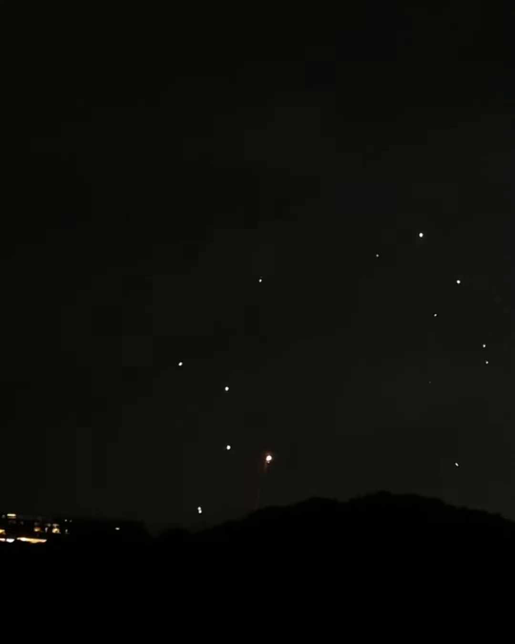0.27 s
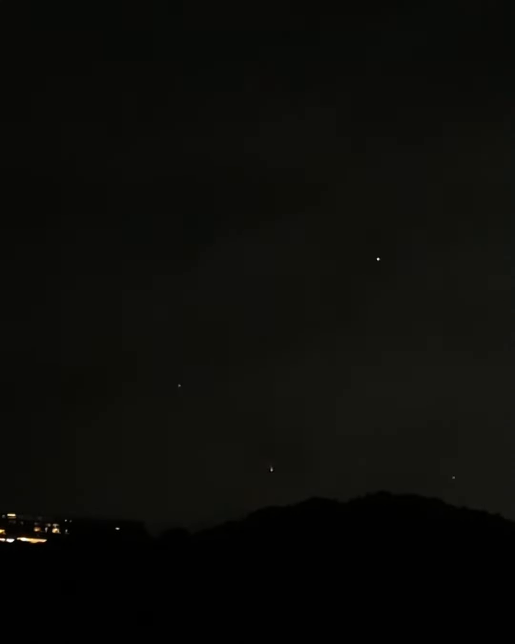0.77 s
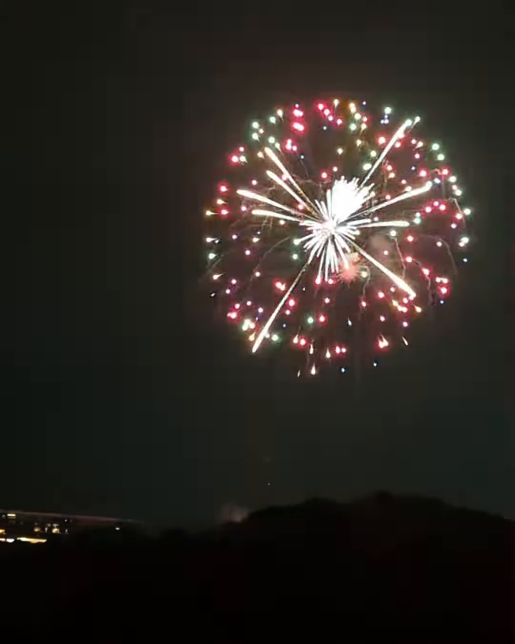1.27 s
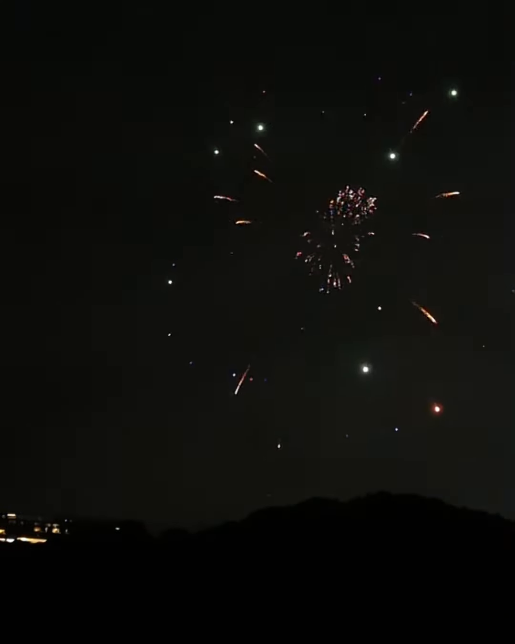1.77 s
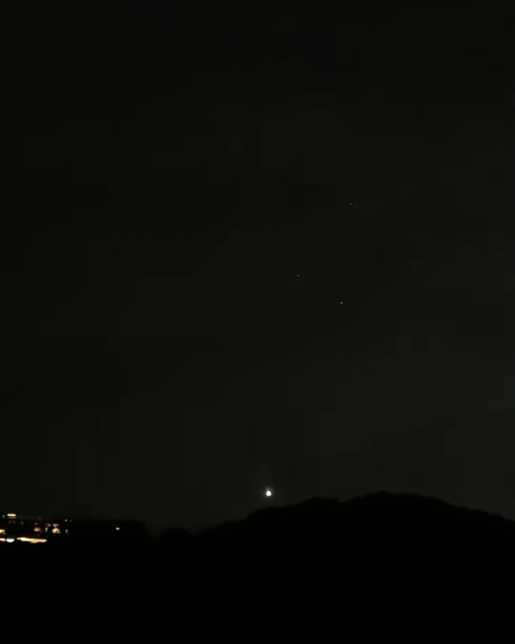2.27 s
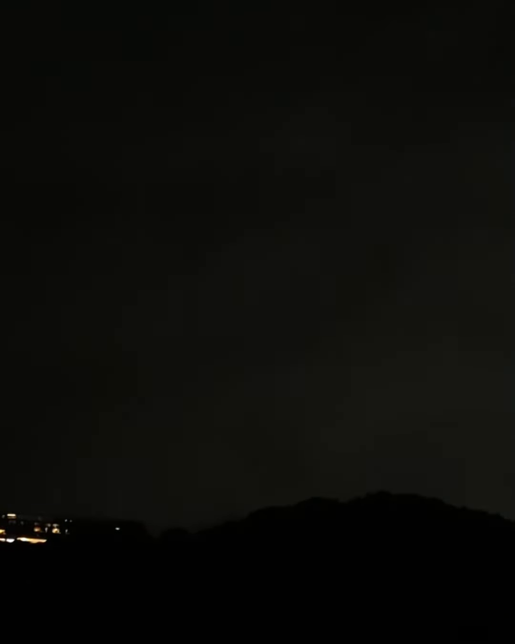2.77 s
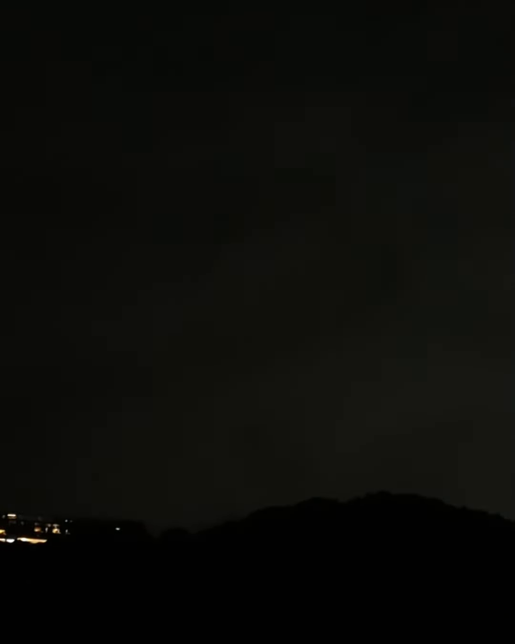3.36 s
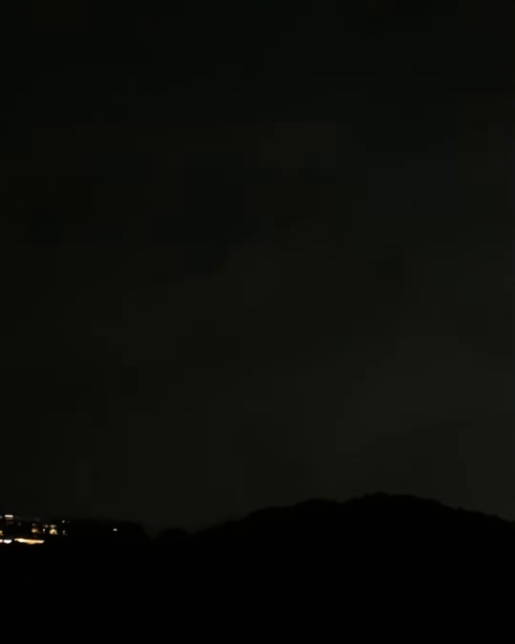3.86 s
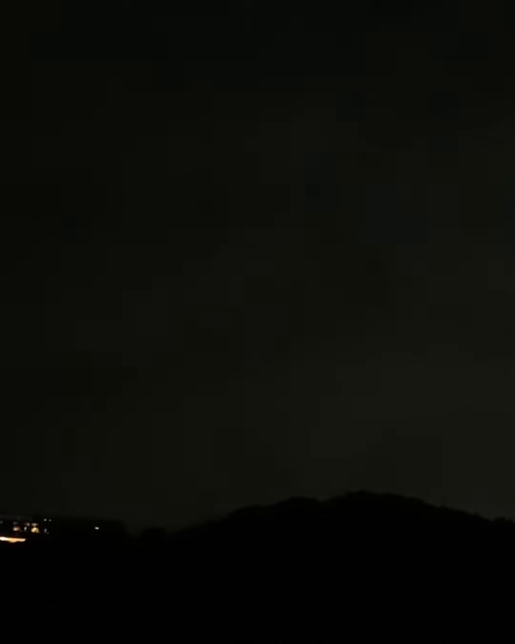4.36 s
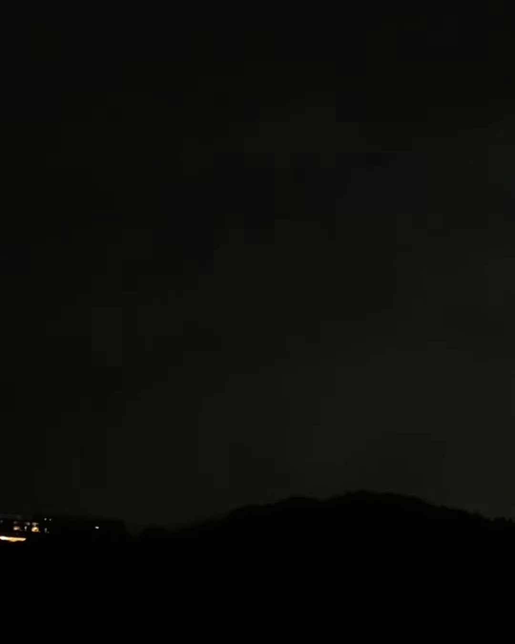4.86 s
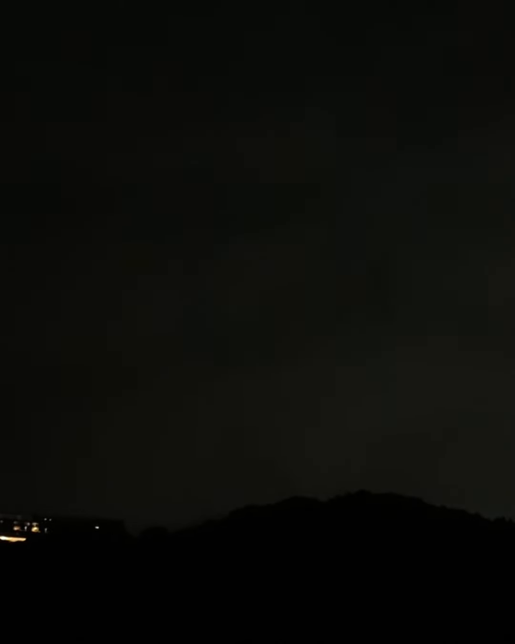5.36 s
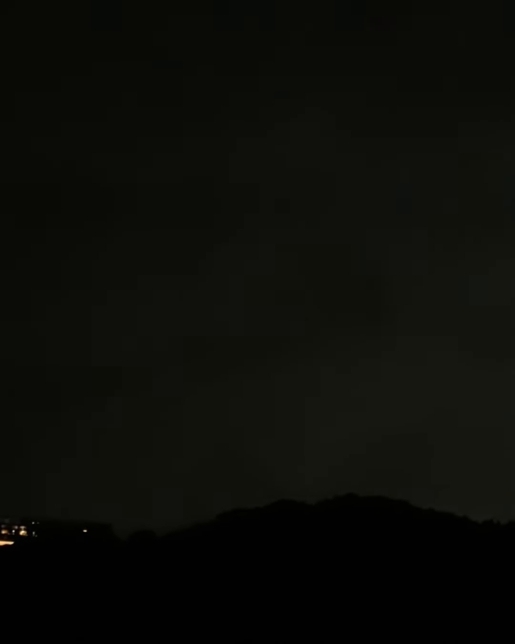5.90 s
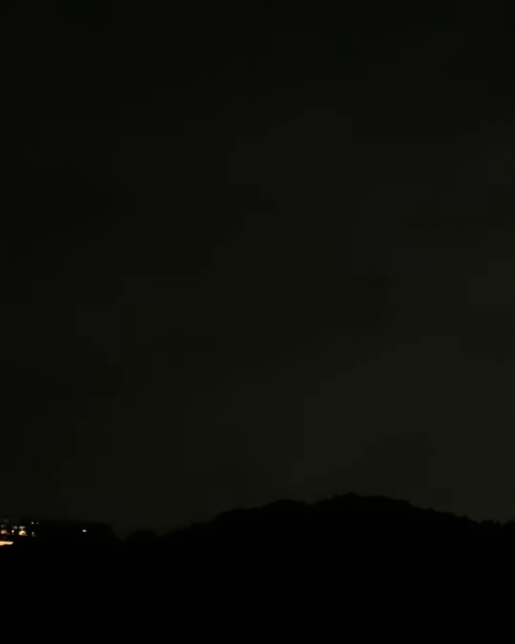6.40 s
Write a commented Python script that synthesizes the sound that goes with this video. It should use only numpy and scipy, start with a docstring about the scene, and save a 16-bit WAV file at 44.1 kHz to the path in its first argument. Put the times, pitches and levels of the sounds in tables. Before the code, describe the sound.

Night outdoors, open stereo microphone facing a far hill, with low town rumble and very faint hiss. The roll of an earlier firework fades at the start; a soft deep thud comes at 0.2 s, a clearer dull one at 0.65 and a weaker one at 0.9. At 2.1 s a shell bursts far off: hard crack, huge low boom slightly right, and a bright grainy splash from nearby surfaces lasting under 0.2 s. Echo thumps follow until about 2.8, one sharper at 2.57, another soft at 3.25, while a deep roll slowly fades. Close cloth rustles in short hissing strokes from 2.3 onward, strongest near 4.75. A faint hum slides upward from 3.3 to 4.7. Soft crackles appear at 2.8, then cluster around 5.7 and 6.4-6.5. At 5.44 the recorder is bumped dully and the low rumble dips until 6.1. Tiny high chirps occur at 6.0, 6.2 and 6.5.

```python
"""Night, open stereo microphone, facing a far hill over the low rumble of a town; an earlier shell's roll dies away.
Small far thuds come first, then at 2.1 s a firework shell bursts high over the hill: crack, deep boom, bright
splash off nearby surfaces and a long roll over the land. Close by, clothing rustles in short strokes with soft
crackles, while a faint far hum slides upward. The recorder is bumped at 5.4 s, the low rumble sinks for half a
second, and faint chirps come near the end. Blasts and bump are shaped pulses and partials; most else is noise."""
import sys
import numpy as np
from scipy import signal
from scipy.fft import rfft, irfft
from scipy.io import wavfile

SR = 44100
rng = np.random.default_rng(int(sys.argv[2]) if len(sys.argv) > 2 else 0)


def log_audio(samples):
    """Write samples as a 16-bit WAV file to the path given in sys.argv[1]."""
    # one column per channel
    frames = np.atleast_2d(samples).T
    # limit to full scale, then quantise
    limited = np.clip(frames, -1, 1)
    pcm = np.round(limited * 32767).astype(np.int16)
    wavfile.write(sys.argv[1], SR, pcm)


N = 292622
TIME = np.arange(N) / SR
BINS = np.fft.rfftfreq(N, 1 / SR)


def gain_of(db):
    """Decibels to amplitude."""
    return 10 ** (np.asarray(db) / 20)


def evened(x):
    """Scales to rms 1."""
    return x / np.sqrt(np.mean(x ** 2) + 1e-20)


def read(points):
    """A table over frequency, joined on a log axis."""
    hz, value = np.transpose(points)
    return np.interp(np.log(BINS + 1), np.log(hz + 1), value)


def filtered(x, gain):
    """Applies a gain for each frequency."""
    return irfft(rfft(x) * gain, N)


def noise(spectrum, likeness):
    """Coloured stereo noise of rms 1, partly shared between left and right."""
    same = np.clip(read(likeness), -1, 1)
    mid_side = rfft(rng.standard_normal((2, N))) * np.sqrt([1 + same, 1 - same])
    mid, side = mid_side * gain_of(read(spectrum))
    return evened(irfft([mid + side, mid - side], N))


def wander(rate_hz):
    """A random drift of rms 1, up to the given rate."""
    return evened(filtered(rng.standard_normal(N), 1 / (1 + (BINS / rate_hz) ** 4)))


def flutter(rate_hz, depth_db):
    """A gain of rms 1 that wanders at random; the depth is the rms swing."""
    return evened(gain_of(depth_db * wander(rate_hz)))


def cloud(s, spread, tail=1.1):
    """A quick smooth rise to one moment, then a slower exponential fall."""
    u = (TIME - s) / spread
    return np.exp(np.where(u < 0, -u ** 2 / 2, (1 - np.sqrt(1 + u ** 2)) / tail))


def swell(s, hold, rise, fade_db_per_s):
    """A smooth rise up to the moment s, a hold, then a steady fade."""
    rising = np.exp(-(np.minimum(TIME - s, 0) / rise) ** 2 / 2)
    return rising * gain_of(-fade_db_per_s * np.maximum(TIME - s - hold, 0))


def together(gains):
    """Unrelated sounds add in power."""
    return np.sqrt(sum(gain ** 2 for gain in gains))


def from_right(x, lag_s=.00018):
    """A sound from a little to the right reaches the left side slightly later."""
    return np.array([np.interp(TIME - lag_s, TIME, x), x])


DIP_S, DIP_END_S, DIP_DB = 5.486, 6.094, -12
DIP_FALL_S, DIP_RETURN_S = 0.058, 0.037  # time constants


def dip():
    """The gain of the low rumble, which sinks for half a second and then comes back."""
    sunk = 1 - np.exp(-np.maximum(TIME - DIP_S, 0) / DIP_FALL_S)
    return gain_of(DIP_DB * sunk * np.exp(-np.maximum(TIME - DIP_END_S, 0) / DIP_RETURN_S))


# likeness of left and right for far sounds, roll and splash included: f/Hz, correlation
FAR_LIKENESS = [(50, 1), (120, 1), (300, 0.93), (650, 0.79), (1400, 0.09), (3000, 0.07), (7000, 0.35),
                (15000, 0.62)]
# spectrum of the far town: f/Hz, relative level/dB per Hz
TOWN_SPECTRUM = [(15, -31.5), (30, -10), (55, -1.5), (100, -6.5), (210, -22), (320, -25.5), (460, -27.5),
                 (700, -29.5), (830, -39.5), (1150, -37), (2000, -47), (4000, -55), (5500, -62.5),
                 (15500, -75)]
TOWN_DB = -47.5


def town():
    """Low far rumble with a faint hiss above it, as coloured noise."""
    return noise(TOWN_SPECTRUM, FAR_LIKENESS) * gain_of(TOWN_DB) * dip() * flutter(rate_hz=4.2, depth_db=0.7)


# glide of the faint far hum: t/s, pitch f/Hz, level/dB
HUM_GLIDE = [(3.25, 92, -75), (3.42, 104.4, -42.5), (3.598, 114.2, -48.5), (3.779, 120.2, -47),
             (3.92, 130.6, -68.5), (4.1, 139.5, -52), (4.36, 151.1, -56.5), (4.7, 157.4, -62)]


def hum():
    """A faint far drone: one unsteady sine that slides upward."""
    s, hz, db = np.transpose(HUM_GLIDE)
    turns = np.cumsum(np.interp(TIME, s, hz)) / SR
    tone = np.sqrt(2) * np.sin(2 * np.pi * turns)
    heard = (TIME > s[0]) * (TIME < s[-1])
    return tone * gain_of(np.interp(TIME, s, db)) * flutter(rate_hz=8.6, depth_db=4.5) * heard


CHIRP_HZ, CHIRP_WIDTH_HZ, CHIRP_SPREAD_S = 3130, 710, 0.021
# faint high chirps, perhaps an insect: t/s, level/dB
CHIRP_TIMES = [(6.025, -72), (6.195, -69), (6.502, -71)]


def chirps():
    """Short swells of one narrow band of noise, a fuzzy whistle."""
    band = 1 / (1 + (2 * (BINS - CHIRP_HZ) / CHIRP_WIDTH_HZ) ** 4)
    whistle = evened(filtered(rng.standard_normal((2, N)), band))
    return whistle * sum(gain_of(db) * cloud(s, CHIRP_SPREAD_S) for s, db in CHIRP_TIMES)


STROKE_RISE_S, STROKE_FADE_DB_PER_S = 0.0363, 228
SETTLE_DB, SETTLE_FADE_DB_PER_S = -16.5, 31.5  # the cloth settles softly after each stroke
# likeness of left and right for cloth close to the microphone: f/Hz, correlation
CLOTH_LIKENESS = [(600, 0.56), (1500, 0.065), (3000, 0.11), (6500, 0.33), (10000, 1)]
# spectrum of the cloth: f/Hz, relative level/dB per Hz
CLOTH_SPECTRUM = [(300, -28), (900, 4), (1800, 4), (3000, 2.5), (5200, -1), (6300, 2), (7600, -1.5),
                  (8900, 1.5), (10000, -3), (12500, -6.5), (15500, -12)]
# strokes of cloth on cloth: t/s, hold/s, level/dB
CLOTH_STROKES = [(2.305, 0.41, -62.5), (2.81, 0.1, -60), (3.132, 0.083, -59), (3.304, 0.09, -74),
                 (4.25, 0.053, -68), (4.442, 0.17, -67.5), (4.759, 0.106, -56.5), (5.105, 1.15, -79.5),
                 (5.224, 0.036, -67), (5.53, 0.053, -73), (5.82, 0.012, -67.5), (6.317, 0.15, -62.5),
                 (6.6, .04, -67.5)]


def rustle():
    """Cloth slides on cloth close to the microphone: a fine hiss with a slight grain."""
    gains = []
    for s, hold, db in CLOTH_STROKES:
        gains.append(gain_of(db) * swell(s, hold, STROKE_RISE_S, STROKE_FADE_DB_PER_S))
        gains.append(gain_of(db + SETTLE_DB) * swell(s, hold, STROKE_RISE_S, SETTLE_FADE_DB_PER_S))
    return noise(CLOTH_SPECTRUM, CLOTH_LIKENESS) * together(gains) * flutter(rate_hz=100, depth_db=1.65)


RING_DB, RING_LAG_S = -3, .00036  # ring against its snaps; it comes later on the left
# likeness of left and right for the crackles: f/Hz, correlation
CRACKLE_LIKENESS = [(600, 0.52), (1500, 0.051), (6500, 0.1), (12000, 0.95)]
# spectrum of the snaps before each one's tilt: f/Hz, relative level/dB per Hz
CRACKLE_SPECTRUM = [(400, -3.5), (1000, -6), (1600, 3), (2200, 2.5), (3300, -3), (4600, -2.5), (5500, -9),
                    (6400, -1.5), (7800, -12), (8850, -9.5), (11000, -18), (15500, -27)]
# soft crackles close to the microphone: t/s, level/dB, spread/s, tilt/dB per octave, ring f/Hz
NEAR_CRACKLES = [(2.772, -45, 0.0045, 5.5, 2150), (2.788, -42, 0.0039, -2, 3320),
                 (4.158, -64, 0.0042, -6, 2400), (5.153, -55, 0.0074, 3, 8800),
                 (5.44, -49.5, 0.0085, -2, 1422), (5.567, -56, 0.0044, -6.5, 2015),
                 (5.704, -43, 0.0016, 5, 4520), (5.71, -36, 0.00089, 4, 4700),
                 (5.716, -47.5, .002, 5, 2220), (5.727, -40.5, 0.0034, 6, 2250),
                 (5.733, -40.5, 0.005, 3.5, 6400), (5.78, -45.5, 0.0057, 8, 8850),
                 (5.877, -54, 0.006, -5.5, 2420), (6.172, -64, .0045, 3, 6500),
                 (6.379, -44.5, 0.0073, 0.5, 1920), (6.523, -48, 0.0038, -9, 1950),
                 (6.543, -42, 0.0021, -20, 1900)]


def crackles(pivot_hz=4000, left_db=0.2, waver=0.0793, waver_hz=300):
    """Short clumps of tiny snaps, some dull and some bright, each with one brief, unsteady ring."""
    grain = noise(CRACKLE_SPECTRUM, CRACKLE_LIKENESS) * flutter(rate_hz=300, depth_db=2.0)
    pace = 1 + waver * wander(waver_hz)  # makes the ring's pitch unsteady
    lag = np.array([[RING_LAG_S], [0]])
    out, size = np.zeros((2, N)), 8192
    # the tilt is level from one octave below the pivot downward
    octaves = np.log2(np.maximum(np.fft.rfftfreq(size, 1 / SR), pivot_hz / 2) / pivot_hz)
    for s, db, spread, tilt_db, ring_hz in NEAR_CRACKLES:
        start = min(round(s * SR) - size // 2, N - size)
        near = slice(start, start + size)
        snaps = evened(irfft(rfft(grain[:, near]) * gain_of(tilt_db * octaves)))
        turns = ring_hz * (np.cumsum(pace[near]) / SR - lag)
        ring = np.sqrt(2) * np.sin(2 * np.pi * turns)
        out[:, near] += cloud(s, spread)[near] * gain_of(db) * (snaps + gain_of(RING_DB) * ring)
    return out * gain_of([[left_db], [-left_db]])


ROLL_RISE_S = 0.016
# the burst's long roll over the land: start, then level and fade (dB per s) of its bass and its midrange
LAND_S, LAND_BASS_DB, LAND_BASS_FADE, LAND_MID_DB, LAND_MID_FADE = 2.13, -36, 4.65, -54, 3.96
# spectra of the roll, bass and midrange: f/Hz, relative level/dB per Hz
BASS_SPECTRUM = [(15, -39.5), (30, -20.5), (50, -5), (70, -1.5), (105, -8), (150, -19.5), (220, -20.5),
                 (400, -45), (900, -86)]
WASH_SPECTRUM = [(80, -22), (180, -3.5), (450, 3.5), (720, 0), (900, -4), (1400, -6), (2000, -12),
                 (3000, -23.5), (5000, -41.5), (9000, -55), (16000, -81.5)]
# groups of echoes that follow the blasts, the first from an earlier shell:
# t/s, hold/s, bass level/dB, midrange level/dB, fade/dB per s
ECHO_GROUPS = [(0, 0.058, -52, -67.5, 10), (0.66, 0.02, -58, -55.5, 71), (0.93, 0, -53.5, -67, 63),
               (2.113, 0.052, -19, -34, 110.5), (2.23, .53, -34.5, -45, 179), (3.027, 0, -43, -50.5, 66)]


def roll(echoes_per_s=500, echo_db=-4):
    """Countless echoes merge into a deep rumble and a lumpy midrange wash."""
    low = [gain_of(LAND_BASS_DB) * swell(LAND_S, 0, ROLL_RISE_S, LAND_BASS_FADE)]
    middle = [gain_of(LAND_MID_DB) * swell(LAND_S, 0, ROLL_RISE_S, LAND_MID_FADE)]
    for s, hold, bass_db, mid_db, fade in ECHO_GROUPS:
        shape = swell(s, hold, ROLL_RISE_S, fade)
        low.append(gain_of(bass_db) * shape)
        middle.append(gain_of(mid_db) * shape)
    bass = noise(BASS_SPECTRUM, FAR_LIKENESS) * together(low) * dip() * flutter(rate_hz=9.8, depth_db=0.95)
    wash = noise(WASH_SPECTRUM, FAR_LIKENESS) * flutter(rate_hz=45, depth_db=1.5)
    arrivals = (rng.random(N) < echoes_per_s / SR) * rng.uniform(-0.61, 1, N)
    grain = evened(filtered(arrivals, gain_of(read(WASH_SPECTRUM))))  # the stronger single echoes
    midrange = evened(wash + gain_of(echo_db) * grain)
    return bass + midrange * together(middle) * flutter(rate_hz=16, depth_db=1)


# spectrum of the nearby echoes just after the burst: f/Hz, relative level/dB per Hz
SPLASH_SPECTRUM = [(200, -18), (600, 0), (1500, -6), (3000, -3), (4500, 0), (7000, -11), (10000, -17.5),
                   (13000, -39), (15500, -52.5)]


def splash(s=2.096, db=-35, t60=0.18):
    """Nearby surfaces throw the crack back as a short, bright, grainy tail."""
    fall = (TIME > s) * gain_of(db - 60 * np.maximum(TIME - s, 0) / t60)
    return noise(SPLASH_SPECTRUM, FAR_LIKENESS) * fall * flutter(rate_hz=1100, depth_db=3.0)


UPPER_RATIO, UPPER_DB = 1.7, -15.5  # each thud carries a weaker, higher partial
# the low push of the burst, its echoes, smaller thuds and a bump of the recorder at 5.44 s:
# t/s at the crest, crest level/dB, pitch f/Hz, swell/s
LOW_THUDS = [(0.167, -30.5, 92, 0.017), (0.6417, -21, 102, 0.011), (0.915, -33.5, 90, 0.028),
             (2.1032, -11, 98, 0.019), (2.12, -3, 63.3, 0.025), (2.1794, -18.5, 106.7, 0.031),
             (2.291, -19, 61, 0.022), (2.435, -22.5, 103.6, 0.019), (2.594, -21.5, 82, 0.029),
             (2.696, -26, 71.3, 0.0316), (3.243, -26.5, 83.7, 0.021), (4.321, -38, 378.6, 0.0059),
             (5.435, -27, 119.6, 0.036), (5.4459, -26.5, 74.4, 0.018)]


def thuds():
    """Far blasts, and a bump of the recorder near 5.44 s, are a few cycles that swell and die."""
    out = np.zeros(N)
    for s, db, hz, swell_s in LOW_THUDS:
        near = abs(TIME - s) < 1 / 4
        t = TIME[near] - s
        u = np.maximum(1 + t / swell_s, 0)
        upper = gain_of(UPPER_DB) * np.sin(2 * np.pi * UPPER_RATIO * hz * t)
        wave = np.cos(2 * np.pi * hz * t) + upper
        out[near] += gain_of(db) * (u * np.exp(1 - u)) ** 4 * wave
    return out


# resonances of the nearby walls, applied to all the sharp parts: f/Hz, width/Hz, level/dB over the direct sound
WALL_RESONANCES = [(425, 25, 2.5), (498, 41, 5), (695, 32, 12.5), (1160, 27, -2), (1660, 200, -5),
                   (1960, 88, 1), (2710, 70, 4.5), (3020, 110, 5), (3660, 130, -7), (6260, 790, -2)]
# the sharp part of each report, and of the bump at 5.44 s, before it is dulled:
# t/s, shock level/dB, scattered level/dB, scatter spread/s, dull above f/Hz
SHARP_PARTS = [(0.636, -28.5, -37.5, 0.00086, 900), (0.65, -52, -42.5, 0.0027, 1260),
               (0.916, -66, -54.5, 0.017, 1370), (2.088, -26, -17, 0.0016, 2900),
               (2.0957, -2, -13, 0.0022, 6000), (2.0982, -14, -42, .002, 4560),
               (2.118, -11.5, -32.5, 0.019, 2580), (2.29, -27, -40.5, .003, 845),
               (2.482, -29.5, -40, 0.005, 860), (2.5731, -11.5, -32, 0.0027, 1030),
               (2.711, -30.5, -39.5, 0.004, 600), (2.784, -38, -39, 0.014, 436),
               (3.26, -57, -39, 0.016, 237), (3.895, -42, -46.5, 0.0053, 517),
               (4.129, -43, -51, .0053, 490), (5.441, -23, -29, 0.0064, 400)]


def reports(low_hz=140, body_hz=700, wide_hz=900, width=0.52):
    """Each report, and the bump, is a steep shock inside a cloud of scattered sound; both are dulled."""
    hiss = rng.standard_normal((2, N))
    mid, side = evened(signal.lfilter(*signal.butter(1, body_hz, fs=SR), hiss))
    side = width * signal.lfilter(*signal.butter(1, wide_hz, "high", fs=SR), side)  # the bass stays central
    scatter = evened(np.array([mid + side, mid - side]))
    out = np.zeros((2, N))
    for s, shock_db, scatter_db, spread, dull_hz in SHARP_PARTS:
        near = abs(TIME - s) < 1 / 5
        u = np.maximum(TIME[near] - s, 0) * dull_hz / 2
        shock = (TIME[near] >= s) * (1 - u) * np.exp(-u)  # a push, then suction
        scattered = cloud(s, spread)[near] * scatter[:, near]
        wave = gain_of(shock_db) * shock + gain_of(scatter_db) * scattered
        out[:, near] += signal.lfilter(*signal.butter(2, dull_hz, fs=SR), wave)
    ring = 1 + sum(gain_of(db) / (1 + 2j * (BINS - hz) / wide) for hz, wide, db in WALL_RESONANCES)
    return filtered(signal.lfilter(*signal.butter(2, low_hz, "high", fs=SR), out), ring)


def scene():
    """Rumble, blasts and the bump, with the small sounds on top."""
    background = town() + hum() + roll() + splash()
    strikes = from_right(thuds()) + reports()
    return background + strikes + chirps() + rustle() + crackles()


EDGE_HZ = 15760  # upper band limit
# colour of the microphone, with a hollow just under 1 kHz: f/Hz, level/dB
MICROPHONE_COLOUR = [(20, -5), (40, -1), (60, 0.5), (130, 0), (180, -0.5), (250, -2), (760, -1.5),
                     (970, -4.5), (1160, -1.5), (1500, -2.5), (12000, -1), (15500, 1)]


def record(dry):
    """The microphone's colour, then the recorder's band limit."""
    coloured = filtered(dry, gain_of(read(MICROPHONE_COLOUR)))
    low_pass = signal.firwin(511, EDGE_HZ, window=("kaiser", 9), fs=SR)
    return signal.oaconvolve(coloured, low_pass[None], "same")


dry = scene()
out = record(dry)
log_audio(out)
```